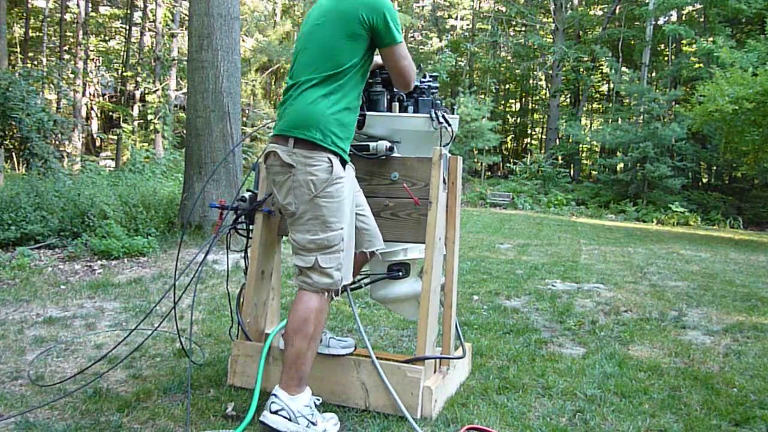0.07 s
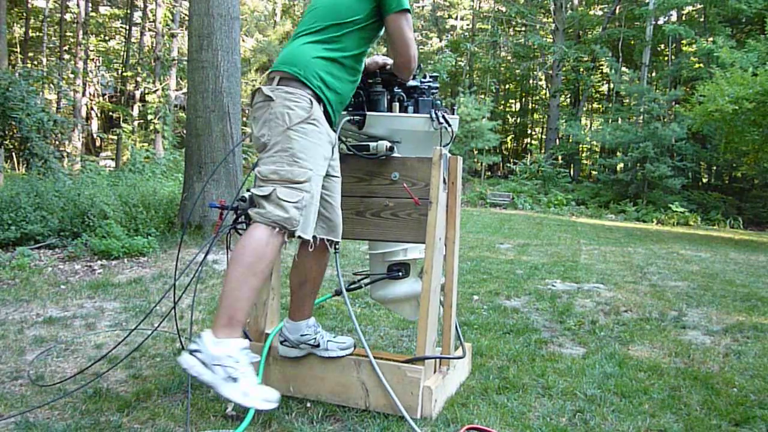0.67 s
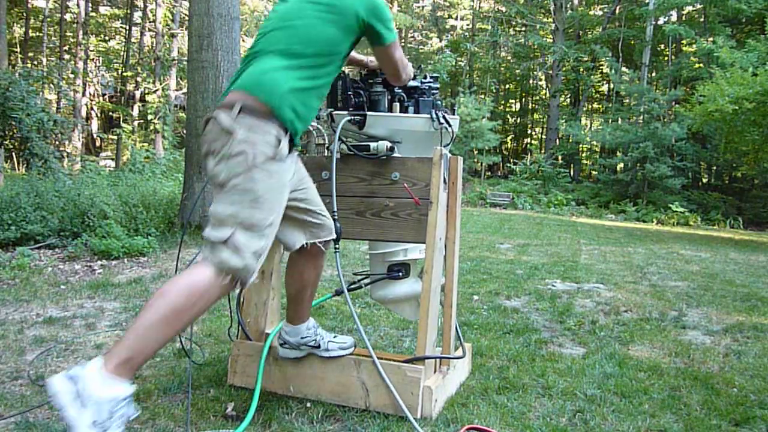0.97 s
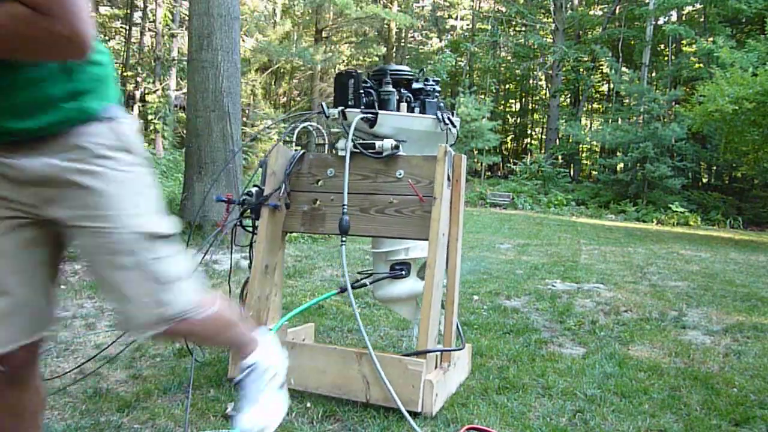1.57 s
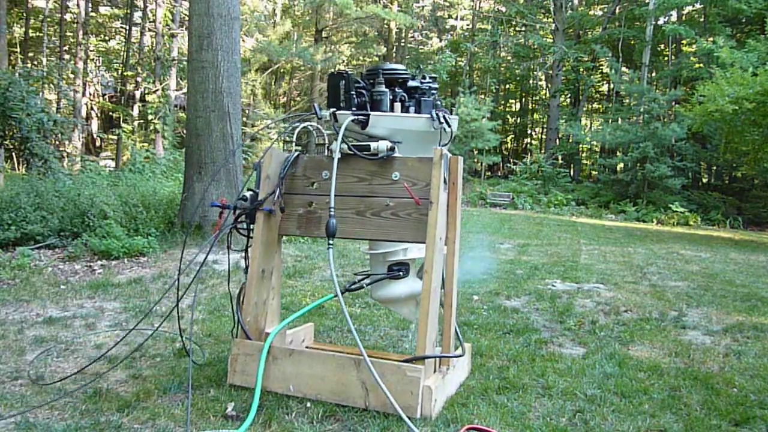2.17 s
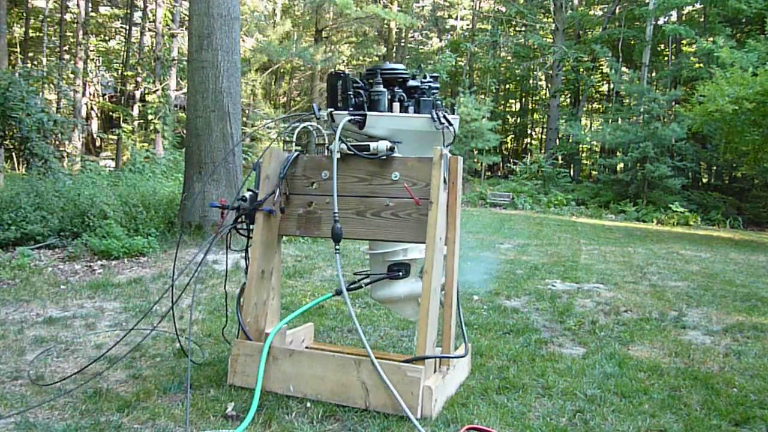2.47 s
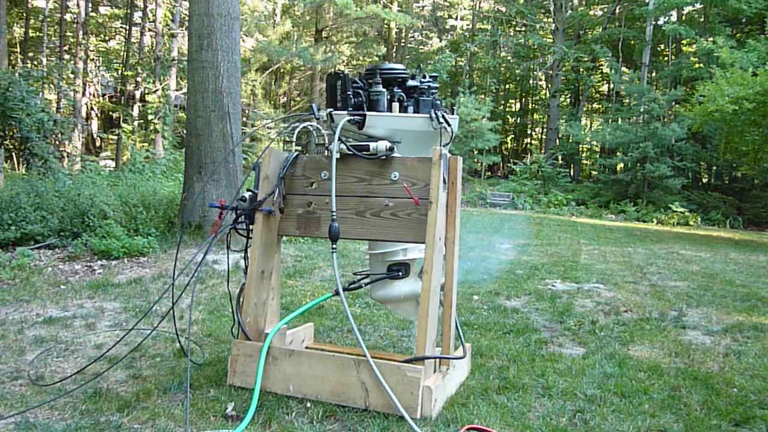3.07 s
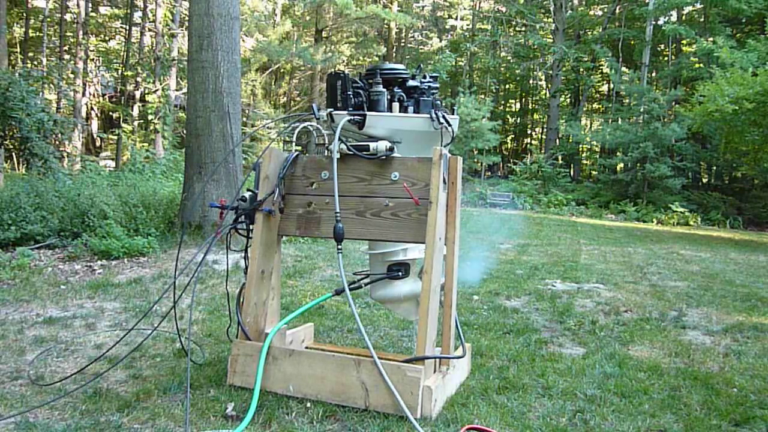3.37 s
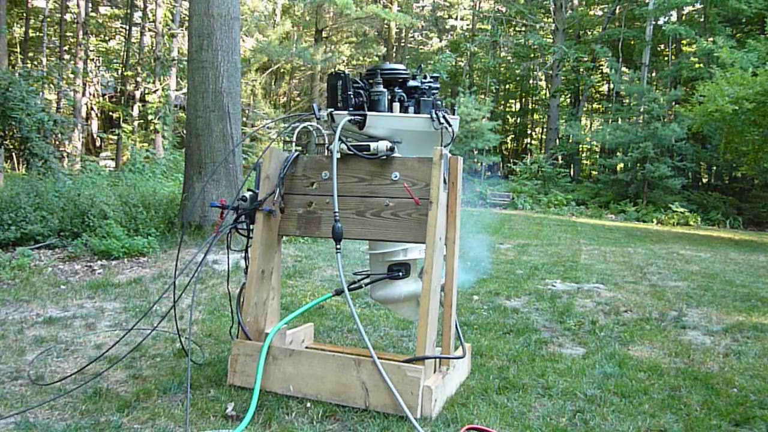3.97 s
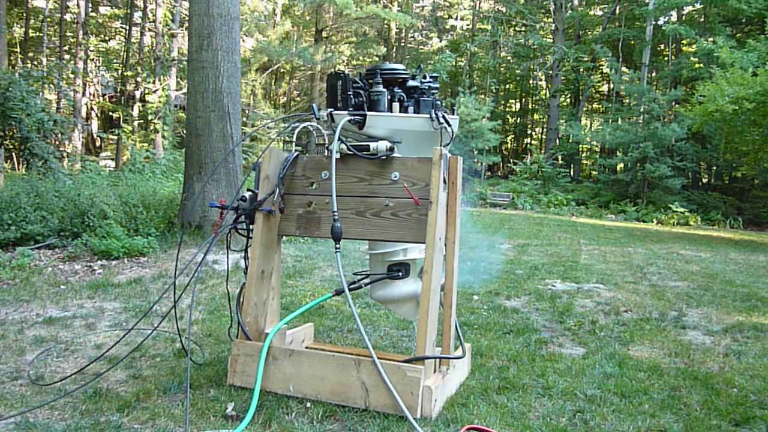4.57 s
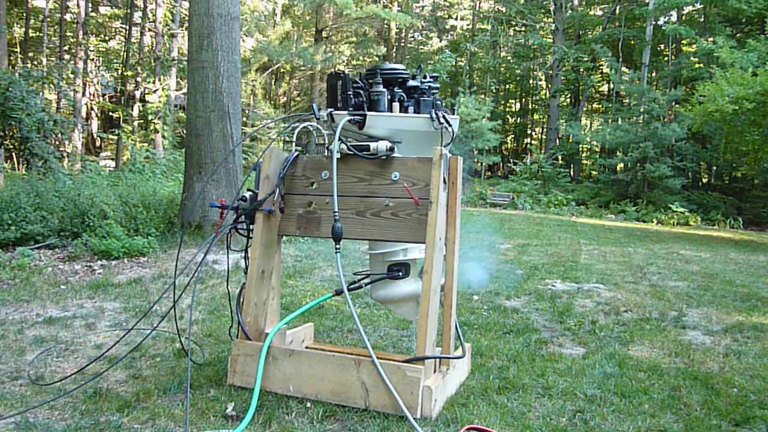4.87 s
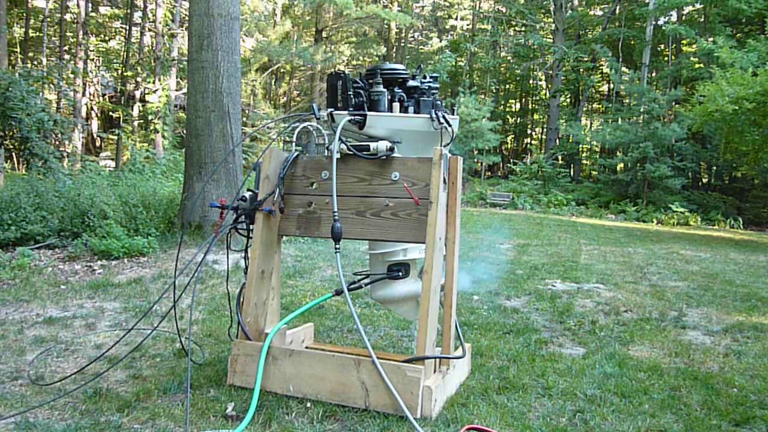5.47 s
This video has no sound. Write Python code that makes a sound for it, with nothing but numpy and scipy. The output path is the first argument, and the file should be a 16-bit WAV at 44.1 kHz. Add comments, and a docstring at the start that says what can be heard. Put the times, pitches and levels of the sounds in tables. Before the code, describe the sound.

A small outboard motor is started by hand outdoors, a short way in front of the microphone. At first there is only a faint trickle of water and a couple of light knocks. Then the cord zips out, the starter clacks, and the engine fires on that single pull. It carries on in a lumpy, sputtering idle, its irregular barks and tinny knocks riding on a steady burble, with hardly any echo.

```python
"""A two-stroke outboard stands on a wooden stand in a quiet yard, cooling water pattering from a hose
onto the grass. After a faint knock the rope is pulled; the starter clacks and winds back, and at about
1.3 s the engine catches. It runs on in a lumpy idle: some strokes fire, each an impulse that rings the
exhaust housing and the metal casing, while the others only puff as the flywheel coasts."""
import sys
import numpy as np
from scipy import signal
from scipy.fft import rfft, irfft, next_fast_len
from scipy.io import wavfile

SR = 44100
rng = np.random.default_rng(int(sys.argv[2]) if len(sys.argv) > 2 else 0)


def digitize_waveform(pressure):
    """Quantize a signal to 16-bit integers and store it at the path in sys.argv[1].

    Rows of a 2-D input are taken as channels; values are limited to [-1, 1].
    """
    field = np.atleast_2d(pressure).T
    bounded = np.clip(field, -1, 1)
    quanta = np.round(bounded * 32767).astype(np.int16)
    wavfile.write(sys.argv[1], SR, quanta)


N = 248283
TIME = np.arange(N) / SR
RING = TIME[:SR // 4]  # time axis of one blow
COAST_HZ = 37  # nominal strokes per second

# modes of the metal casing: pitch_hz, t60_s, level_db
CASING_MODES = [(579.6, 0.21, -28.5), (692.5, 0.12, -21.5), (824, 0.053, -12), (959.5, 0.064, -13),
                (1127.5, 0.077, -12.5), (1191.4, 0.16, -20.5), (1635, 0.073, -29.5), (2210, 0.019, -32),
                (2620, 0.075, -31), (3853, 0.052, -32.5), (4540, 0.049, -27)]


def firings():
    """Impulse excitation: each firing rings the exhaust and the casing and lets out a crack of gas."""
    # spectrum of the escaping gas: frequency_hz, level_db
    crack_spectrum = [(500, -19.5), (1000, 6), (1500, 6.5), (2100, -1), (2800, 1.5), (3600, 1.5),
                      (4700, -6.5), (6000, -4), (8000, -14.5)]
    out = np.zeros(N)
    knock_rise, gas_rise = np.clip(RING / 0.0019, 0, 1), np.clip(RING / 0.0025, 0, 1)
    for s, bark_db, knock_db, crack_db in fired_strokes():
        add(out, s, undb(bark_db) * bark(detune=0.025))
        knock = strike(CASING_MODES, scatter_db=3, detune=0.023)
        add(out, s + 0.00041, undb(knock_db) * knock_rise * knock)
        gas = hiss(crack_spectrum, size=len(RING)) * (fade(0.039) + undb(-24) * fade(0.3))
        add(out, s + 0.0003, undb(crack_db) * gas_rise * gas)
    return out


def bark(detune):
    """Cavity resonance: a pressure pulse rings the exhaust; gas heat shifts its modes and their balance."""
    # modes of the exhaust housing: pitch_hz, t60_s, signed_gain
    modes = [(95, 0.066, -0.015), (233.1, 0.048, 0.3), (321.2, 0.043, 0.24), (355, 0.052, -0.47),
             (467.8, 0.094, 0.1), (580, 0.24, -0.018), (697, 0.061, -0.033)]
    warmth = 1 + detune * rng.standard_normal()
    shares = undb(1.5 * rng.standard_normal(len(modes)))
    return sum(share * gain * fade(t60) * np.sin(2 * np.pi * hz * warmth * RING)
               for (hz, t60, gain), share in zip(modes, shares))


def fired_strokes():
    """Intermittent combustion, one row a firing: start_s, bark_db, knock_db, crack_db."""
    # bursts of firings on consecutive strokes: start_s, firing_count, bark_db, knock_db
    bursts = [(1.275, 2, 0, -1.5), (1.3249, 1, -5.5, -7), (1.4364, 1, 3, -13.5), (1.4809, 1, -12, -15),
              (1.5538, 1, 1.5, -4), (1.6272, 1, 5, -10.5), (1.7523, 2, 0, -8), (1.8297, 1, 1.5, -10.5),
              (1.9073, 1, -3, -14), (1.963, 2, 1, -5), (2.147, 1, 5.5, -8), (2.1748, 1, -8.5, -5.5),
              (2.2527, 1, -3, -22), (2.3054, 1, 5.5, -10.5), (2.386, 1, 1, -4), (2.4617, 1, 2, -6.5),
              (2.5909, 1, -0.5, -3.5), (2.668, 1, 2.5, -9), (2.7967, 2, 0, -4), (2.8751, 1, -5, -20.5),
              (2.9247, 1, 3.5, -12), (3.004, 1, -1.5, -1), (3.0812, 1, 2, -19.5), (3.134, 1, 2, -10.5),
              (3.2127, 1, -7.5, -5.5), (3.2668, 2, -1.5, -5), (3.3467, 1, 4, -9.5), (3.4785, 2, 0.5, -3.5),
              (3.559, 1, 2.5, -11), (3.64, 1, -3.5, -17.5), (3.6969, 4, -0.5, -10.5), (3.9269, 4, -1, -11),
              (4.1639, 4, -1.5, -10.5), (4.4163, 1, -3, -18), (4.444, 2, -1.5, -5), (4.6078, 2, -1, -6.5),
              (4.689, 1, 2.5, -15), (4.7737, 1, -4, -17), (4.8355, 2, 1, -5.5), (5.0113, 1, -1, -11),
              (5.0418, 1, 3, -11.5), (5.0706, 1, -6, -4), (5.2172, 1, 2, -9.5), (5.3086, 2, -1.5, -5.5),
              (5.399, 1, 2, -10), (5.487, 1, -1, -4), (5.5739, 1, 2, -14)]
    # offsets for the first to fourth firing of a burst: bark_db, knock_db, crack_db
    pattern = [(1, 0, 1), (2, -7, -2.5), (0, 1, -9.5), (3.5, 1, 0)]
    rows = []
    for start, count, burst_bark, burst_knock in bursts:
        for k, (more_bark, more_knock, more_crack) in enumerate(pattern[:round(count)]):
            bark_db, knock_db = burst_bark + more_bark, burst_knock + more_knock
            crack_db = -22 + 0.9 * bark_db + 0.82 * knock_db + more_crack  # harder firings crack more
            rows.append((start + k / idle_hz(start), bark_db, knock_db, crack_db))
    return np.array(rows)


def idle_hz(s):
    """Repetition rate of the strokes while firing, at time s."""
    # the settling idle speed: time_s, stroke_rate_hz
    speeds = [(1.28, 35.5), (1.75, 38.8), (2.8, 37.3), (3.48, 36.5), (3.7, 33.6), (4.17, 32.7),
              (4.45, 34.5), (5.63, 31.6)]
    return np.interp(s, *np.transpose(speeds))


def crank(slowing):
    """Flywheel inertia: each firing kicks the wheel, which slows until the next. Counts the strokes."""
    fired = np.sort(fired_strokes()[:, 0])
    marks = np.r_[fired[0] - 4 / COAST_HZ, fired, fired[-1] + 3 / COAST_HZ]
    gap_strokes = np.maximum(np.round(np.diff(marks) * COAST_HZ), 1)
    place = np.interp(TIME, marks, np.arange(len(marks)))
    gap = np.minimum(place.astype(int), len(gap_strokes) - 1)
    count, progress = gap_strokes[gap], place - gap
    completed = np.r_[0, np.cumsum(gap_strokes)][gap]
    return completed + count * progress * (1 + slowing * count * (1 - progress))


def running(start_s, rise_s, db_per_hz):
    """Gain of a part that comes in as the engine turns over and grows with its speed."""
    return np.clip((TIME - start_s) / rise_s, 0, 1) * undb(db_per_hz * (idle_hz(TIME) - COAST_HZ))


def puffs(strokes):
    """Forced vibration: every stroke pumps air through the exhaust, whose lowest resonance drones."""
    # harmonics of the stroke rate: multiple, level_db
    harmonics = [(1, -4.5), (2, 0), (3, -0.5)]
    half_burn_db, half_burn_share = 10.5, 0.08  # now and then a stroke burns weakly
    out = np.zeros(N)
    for s in TIME[1:][np.diff(np.floor(strokes)) > 0]:
        db = -19 + 1.3 * rng.standard_normal() + half_burn_db * (rng.random() < half_burn_share)
        add(out, s, undb(db) * bark(detune=0.02))
    pumping = -sum(undb(db) * np.sin(round(multiple) * 2 * np.pi * strokes) for multiple, db in harmonics)
    drone = undb(-26.5) * band(pumping, hz=101.7, width_hz=39)
    waver = 1 + 0.33 * band(rng.standard_normal(N), hz=15, width_hz=25)
    burble = hiss([(15, -22), (35, -9.5), (55, -9), (88, 4.5), (120, 3.5), (160, -18), (300, -42)])
    return (out + drone * waver + undb(-32) * burble) * running(start_s=1.19, rise_s=0.03, db_per_hz=0.53)


def machinery(strokes):
    """Amplitude modulation: the rush of intake, gears and exhaust pulses over casing ticks and hum."""
    # spectrum of the rush: frequency_hz, level_db
    rush_spectrum = [(94, -47.5), (160, -7.5), (177, -8), (340, 5), (537, -11), (687, -9.5), (770, -13.5),
                     (907, -10), (1410, -24.5), (1610, -20), (2060, -27), (4900, -33), (5490, -38),
                     (6260, -30.5), (8000, -49), (10400, -79), (17600, -120)]
    pulse = 1 + 0.24 * np.exp(-(strokes % 1) / 0.04)
    rush = unit(hiss(rush_spectrum) * pulse)
    ticks = np.zeros(N)
    for s in rng.uniform(0, N / SR, size=220):
        add(ticks, s, undb(2 * rng.standard_normal()) * strike(CASING_MODES, scatter_db=6.5, detune=0.038))
    spin_up = running(start_s=1.17, rise_s=0.13, db_per_hz=0.5)
    return (undb(-24.5) * rush + undb(-30) * ticks + casing_hum()) * spin_up


def casing_hum():
    """Driven resonance: steady shaking keeps a few modes of the casing ringing."""
    # sustained modes: pitch_hz, width_hz, level_db
    modes = [(584.4, 15, -40.5), (679.5, 28, -39.5), (1176, 26, -46.5)]
    return sum(undb(db) * band(band(rng.standard_normal(N), hz, width), hz, width)
               for hz, width, db in modes)


def starter():
    """Friction and impact: the rope groans under load and whirrs back; pawls clack, the handle knocks."""
    # rope over its pulley, two stages of pull and two of rewind: start_s, length_s, level_db
    rope_runs = [(1.135, 0.21, -38), (1.27, 0.055, -26.5), (1.405, 0.02, -22), (1.495, 0.026, -31)]
    # spectrum of the running rope: frequency_hz, level_db
    rope_spectrum = [(300, -4.5), (700, 0.5), (1700, -6.5), (2600, -15.5), (4500, -19), (7500, -26.5),
                     (10000, -18.5)]
    # one groan for each compression pulled through: start_s, length_s, level_db
    groans = [(1.118, 0.054, -32), (1.183, 0.075, -33.5)]
    # modes of the steel pawls: pitch_hz, t60_s, level_db
    pawl_modes = [(2580, 0.07, -20), (3054, .1, -9), (3400, 0.025, -2), (4150, .025, -3), (4900, 0.025, -1),
                  (5593, 0.11, -10), (6100, 0.02, -4), (6944, 0.02, -3)]
    # pawl strikes: start_s, level_db
    clacks = [(1.221, -32), (1.3199, -22.5), (1.3259, -9.5), (1.329, -20), (1.3338, -24), (1.3498, -22),
              (1.3551, -17.5)]
    # knocks of the stand and handle: start_s, level_db, centre_hz
    knocks = [(.752, -37, 503), (1.032, -31.5, 466), (1.033, -38, 1410), (1.153, -32, 1030),
              (1.178, -29.5, 1600), (1.188, -21, 640), (1.192, -45, 990), (1.423, -17, 1650),
              (1.433, -14, 1370)]
    out = hiss(rope_spectrum) * swells(rope_runs, attack_s=0.012, t60_s=0.29)
    groan = band(band(rng.standard_normal(N), 300, 45), 300, 45)
    out += groan * swells(groans, attack_s=0.016, t60_s=0.079)
    for s, db in clacks:
        snap = hiss([(1000, -13), (2400, -7.5), (3200, -2), (7000, -4), (10000, -20)], size=len(RING))
        steel = strike(pawl_modes, scatter_db=1.5, detune=0.0011)
        add(out, s, undb(db) * (undb(-5.5) * steel + undb(3.5) * snap * fade(0.0057)))
    for s, db, hz in knocks:
        body = band(rng.standard_normal(len(RING)), hz, 0.12 * hz)
        add(out, s, undb(db) * band(body, hz, 1.1 * hz) * fade(0.042))
    return out


def trees(x):
    """Scattering: a faint, diffuse echo returns from the stand and the edge of the wood."""
    scatter = hiss([(100, -10.5), (400, -7.5), (1500, -8), (8000, -7)], size=len(RING))
    echo = scatter * fade(0.36) * (RING > 0.012)
    return undb(-15) * signal.fftconvolve(x, echo / np.linalg.norm(echo))[:N]


def water():
    """Shot noise: cooling water hits the ground in random drops of very uneven size."""
    # spectrum of the splash: frequency_hz, level_db
    splash_spectrum = [(600, -6), (1200, 6), (2000, 3), (3800, 5.5), (7000, 2), (9000, -33)]
    drops_per_s, spread_db = 900, 4.2
    drops = (rng.random(N) < drops_per_s / SR) * rng.standard_normal(N)
    drops *= undb(spread_db * np.minimum(rng.exponential(size=N), 4))
    splat = rng.standard_normal(len(RING)) * fade(0.013)
    return undb(-54) * colour(signal.fftconvolve(drops, splat)[:N], splash_spectrum)


def yard():
    """Ambient noise: a faint, steady rumble and hiss."""
    # spectrum of the quiet yard: frequency_hz, level_db
    spectrum = [(15, -51.5), (25, -20.5), (58, -6), (76, -4.5), (117, -4), (266, -12.5), (315, -8),
                (382, -12), (475, -12.5), (523, -11), (1510, -20), (5990, -19.5), (8000, -32), (10400, -57),
                (17600, -120)]
    return undb(-52.5) * hiss(spectrum)


def strike(modes, scatter_db, detune):
    """Modal superposition: damped sines whose level, pitch and phase vary from blow to blow."""
    chance = rng.standard_normal((len(modes), 3))
    return sum(undb(db + scatter_db * gain) * fade(t60)
               * np.sin(2 * np.pi * (hz * (1 + detune * shift) * RING + phase))
               for (hz, t60, db), (gain, shift, phase) in zip(modes, chance))


def swells(rows, attack_s, t60_s):
    """Envelope of (start_s, length_s, level_db) events that rise, hold and die away."""
    return sum(undb(db - 60 * np.maximum(TIME - s - length, 0) / t60_s)
               * np.clip((TIME - s) / attack_s, 0, 1) for s, length, db in rows)


def fade(t60_s):
    """Damping: exponential decay by 60 dB in t60_s."""
    return np.exp(-np.log(1000) * RING / t60_s)


def band(x, hz, width_hz):
    """One resonance; rms 1."""
    return unit(signal.lfilter(*signal.iirpeak(hz, hz / width_hz, SR), x))


def hiss(points, size=N):
    """Coloured noise; rms 1."""
    return colour(rng.standard_normal(size), points)


def colour(x, points):
    """Spectral shaping by (frequency_hz, level_db) points; rms 1."""
    hz, db = np.transpose(points)
    size = next_fast_len(len(x))
    bin_hz = np.maximum(np.fft.rfftfreq(size, 1 / SR), 1)
    gain = undb(np.interp(np.log(bin_hz), np.log(hz), db))
    return unit(irfft(rfft(x, size) * gain, size)[:len(x)])


def add(track, s, sound):
    """Superpose a sound on a track at time s."""
    i = int(np.clip(s * SR, 0, N))
    track[i:i + len(sound)] += sound[:N - i]


def undb(db):
    """Decibels to gain."""
    return 10 ** (np.asarray(db) / 20)


def unit(x):
    """Scale to rms 1."""
    return x / np.sqrt(np.mean(x ** 2))


def scene():
    """Interaural decorrelation: all comes from straight ahead, and only the treble spreads."""
    strokes = crank(slowing=0.029)  # share of speed swing per coasted stroke
    near = firings() + puffs(strokes) + machinery(strokes) + starter()
    mid = near + trees(near) + water() + yard()
    spread = rng.standard_normal(len(RING)) * fade(0.06)
    side = signal.fftconvolve(mid, spread / np.linalg.norm(spread))[:N] + undb(-4) * water()
    side = undb(-13) * signal.sosfilt(signal.butter(1, 2600, "high", fs=SR, output="sos"), side)
    side = signal.sosfilt(signal.butter(1, 700, "high", fs=SR, output="sos"), side)
    return np.array([mid + side, mid - side])


def record(dry):
    """Band limiting: a narrow treble notch, clipping at full scale, then a steep low-pass."""
    notch_hz, top_hz = 5480, 7900
    notched = signal.lfilter(*signal.iirnotch(notch_hz, 22, SR), dry)
    low_pass = signal.ellip(8, 0.2, 70, top_hz, fs=SR, output="sos")
    return signal.sosfilt(low_pass, np.clip(notched, -1, 1))


dry = scene()
out = record(dry)
digitize_waveform(out)
```